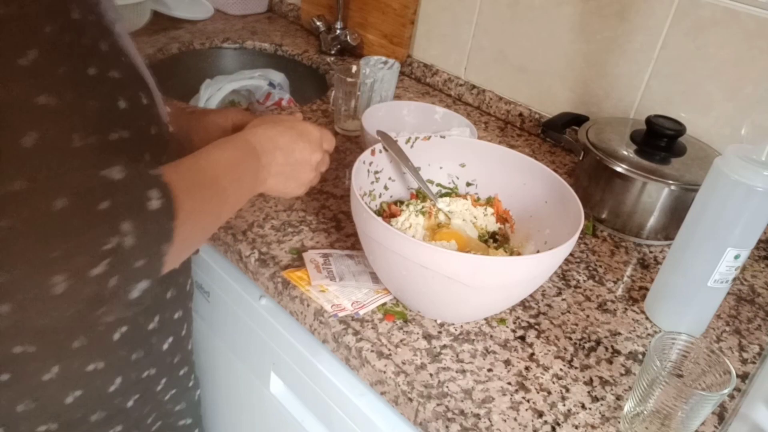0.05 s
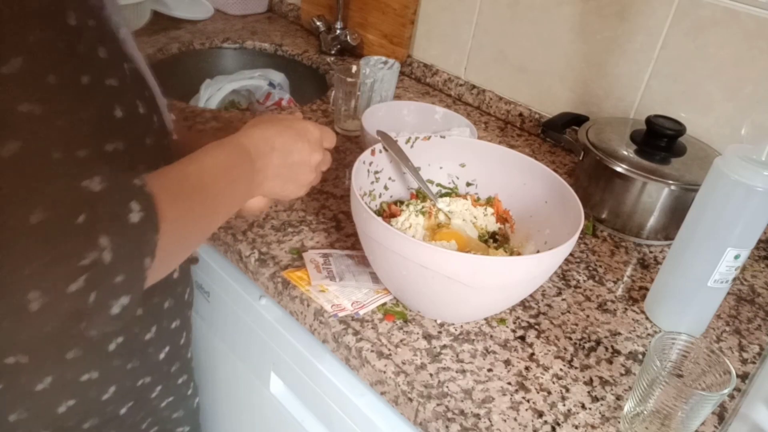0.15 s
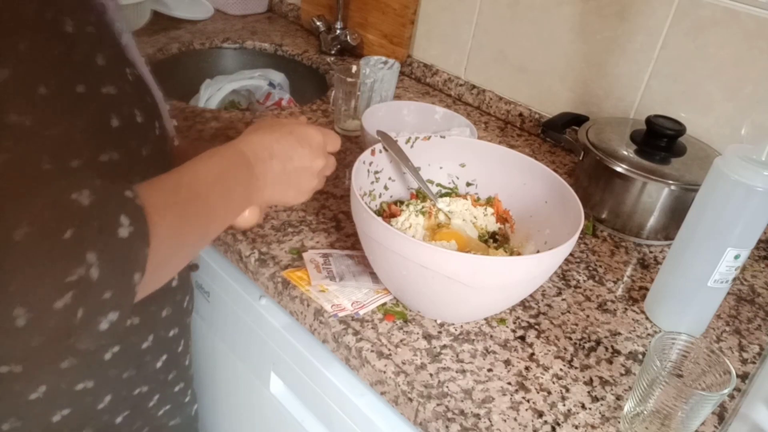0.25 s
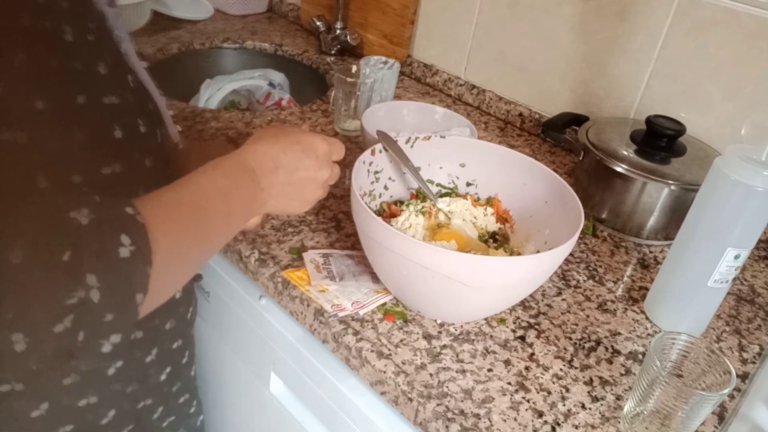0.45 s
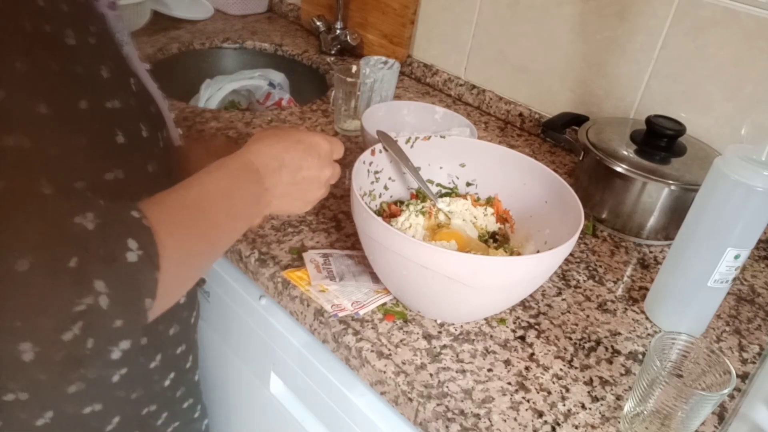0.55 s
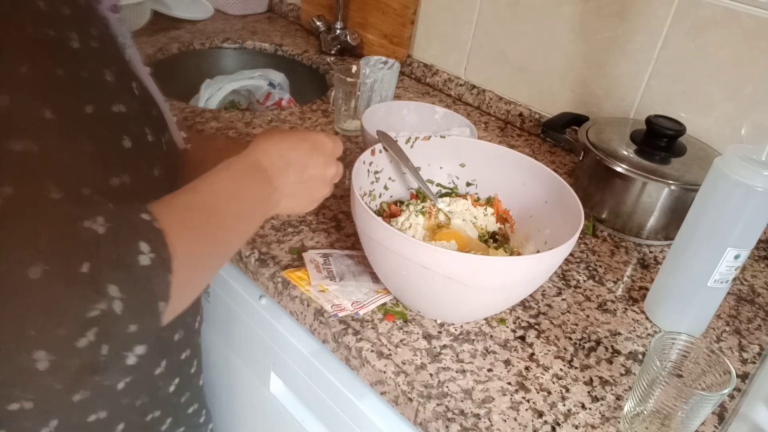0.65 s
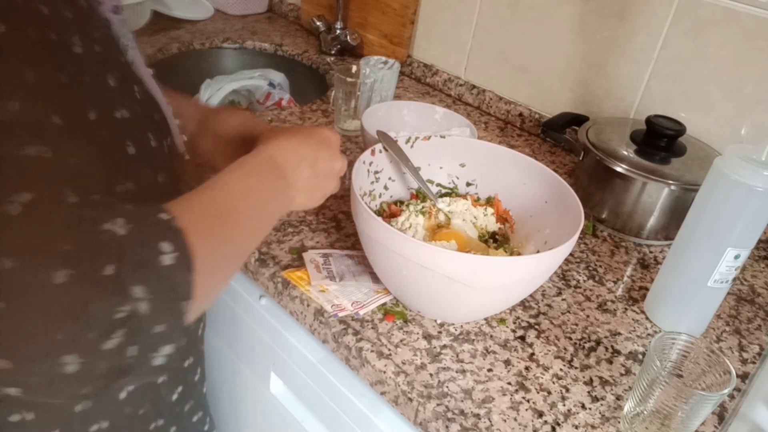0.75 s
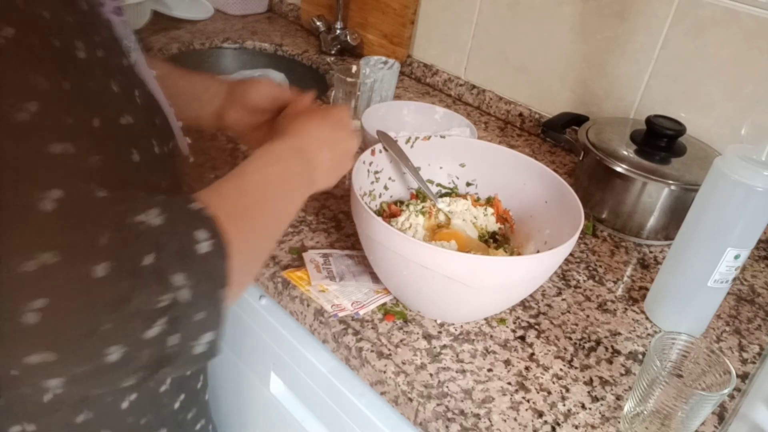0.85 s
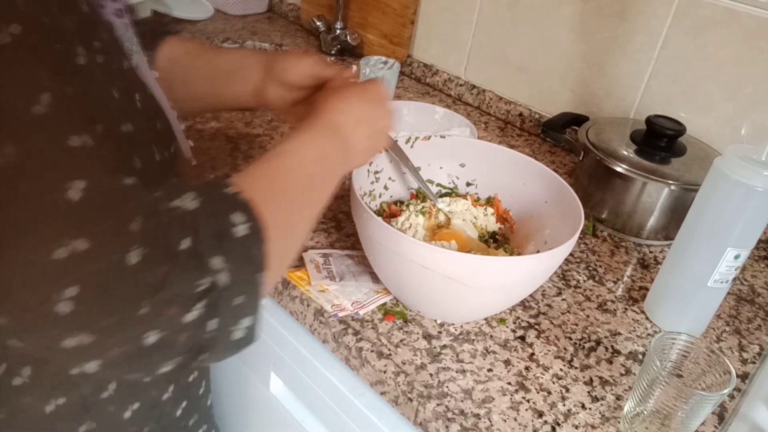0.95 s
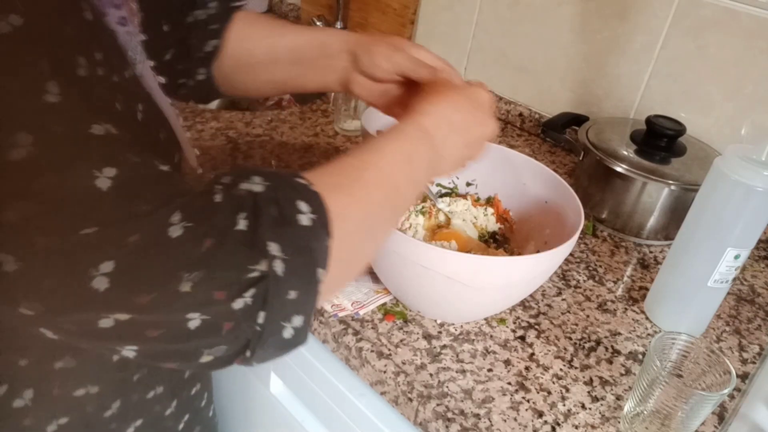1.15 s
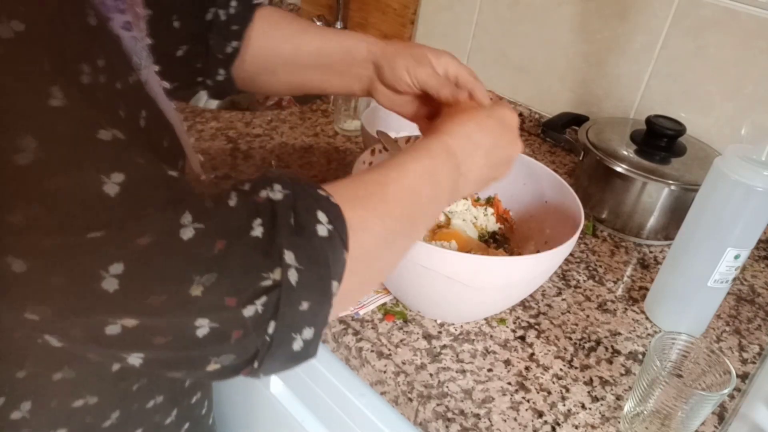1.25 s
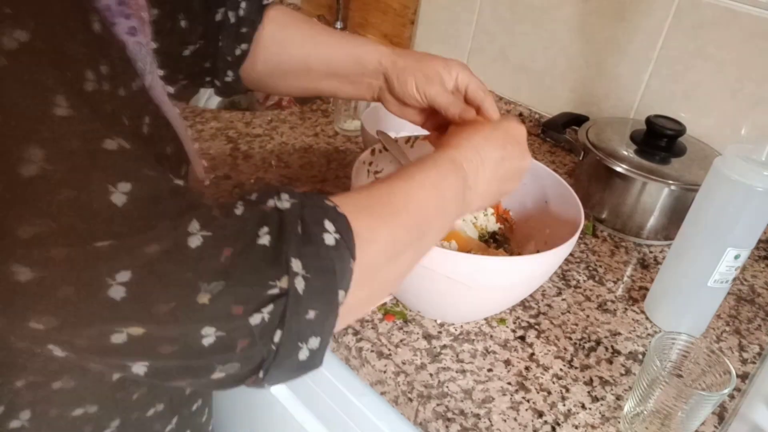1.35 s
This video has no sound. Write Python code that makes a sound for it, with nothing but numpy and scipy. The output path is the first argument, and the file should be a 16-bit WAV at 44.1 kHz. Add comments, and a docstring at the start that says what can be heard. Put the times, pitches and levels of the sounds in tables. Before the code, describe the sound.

Two quick egg cracks against a hard kitchen counter, followed by small ticks of breaking shell

```python
"""A soft rustle of cloth and skin dies away over the hush and hum of a small tiled kitchen, both shaped noise and a sine.
Fingers crackle the shell once; then an egg is knocked twice on a stone worktop, each knock a dull click,
a burst of tiny fractures and decaying sine rings, with a low thud of the hand. The shell splits further on the second.
Afterwards the shell ticks and crackles faintly, among soft low bumps of hands and dishes.
Echoes are noise bands that follow the energy held in the room."""
import sys
import numpy as np
from scipy import signal
from scipy.io import wavfile

SR = 44100
rng = np.random.default_rng(int(sys.argv[2]) if len(sys.argv) > 2 else 0)


def log_audio(samples):
    """Write samples as a 16-bit WAV file to the path given in sys.argv[1]."""
    # one column per channel
    frames = np.atleast_2d(samples).T
    # limit to full scale, then quantise
    limited = np.clip(frames, -1, 1)
    pcm = np.round(limited * 32767).astype(np.int16)
    wavfile.write(sys.argv[1], SR, pcm)


def makeup_ratio(level_db):
    """Linear amplitude ratio for a level in decibels (20 dB per factor of ten)."""
    decades = np.asarray(level_db, float) / 20
    return 10 ** decades


N = 61739  # length in samples

BAND_EDGES_HZ = 22 * 2 ** np.arange(0, 9.8, 1 / 4)  # quarter octaves


def rms_one(x):
    """Scale to unit rms."""
    return x / np.sqrt(np.mean(x ** 2) + 1e-20)


def at_hz(points, hz):
    """Read a spectrum on a log-frequency axis."""
    point_hz, value = np.transpose(points)
    return np.interp(np.log(hz), np.log(point_hz), value)


def band(x, low, high, order):
    """Butterworth band-pass."""
    edges = [max(low, 20), min(high, 20000)]
    return signal.sosfilt(signal.butter(order, edges, "band", fs=SR, output="sos"), x)


def drift(rate_hz):
    """Slow random wander of about unit rms: noise at every 40th sample through two equal smoothing poles."""
    r = np.exp(-80 * np.pi * rate_hz / SR)
    slow = signal.lfilter([1], [1, -2 * r, r * r], rng.standard_normal(N // 40 + 502))[500:]
    return np.interp(np.arange(N) / 40, np.arange(len(slow)), rms_one(slow))


def banded(gain):
    """Quarter-octave bands of noise, each under its own gain."""
    white = rng.standard_normal((2, N + 4000))
    total = np.zeros(N)
    for k, (low, high) in enumerate(zip(BAND_EDGES_HZ, BAND_EDGES_HZ[1:])):
        # neighbouring bands take turns between two noises
        noise = band(white[k % 2], low, high, order=2)[-N:]
        total += gain(np.sqrt(low * high)) * noise
    return total


# Fade of the rustle. Each row: time in seconds, level in dB.
RUSTLE_FADE = [(0, -55), (.05, -56.5), (.11, -60.5), (.15, -70.5), (.23, -90)]
# Colour of brushing cloth and skin. Each row: frequency in Hz, relative density in dB per Hz.
RUSTLE_COLOUR = [(300, -9.5), (900, -6.5), (1800, -7), (2500, -2.5), (3700, -7.5), (4700, -19), (6000, -18),
                 (7800, -6), (9500, -17), (12000, -26), (15500, -18)]


def rustle():
    """Cloth and skin brushing: coloured noise that flutters as it fades out."""
    s, db = np.transpose(RUSTLE_FADE)
    fade_db = np.interp(np.arange(N) / SR, s, db, right=-120)
    level = makeup_ratio(fade_db + .6 * drift(150))
    return level * rms_one(banded(lambda hz: makeup_ratio(at_hz(RUSTLE_COLOUR, hz))))


# Colour of the room noise. Each row: frequency in Hz, relative density in dB per Hz.
HUSH_COLOUR = [(20, -52), (50, -5), (75, -11.5), (98, -12), (135, -5.5), (200, -3.5), (400, -6), (550, -8),
               (800, -8.5), (1400, -12.5), (2000, -15.5), (2800, -19.5), (3600, -17), (4500, -28),
               (6000, -28), (7900, -20.5), (9500, -30.5), (12000, -34), (15500, -32)]
HUSH_DB = -62.5  # overall rms


def hush(patchy_db, lumps_db):
    """Steady room noise: every band wavers by itself, and those below 1200 Hz also swell together in lumps."""
    lumps = drift(28)

    def gain(hz):
        """Wavering level of one band."""
        return makeup_ratio(at_hz(HUSH_COLOUR, hz) + patchy_db * drift(8) + lumps_db * lumps * (hz < 1200))
    return makeup_ratio(HUSH_DB) * rms_one(banded(gain))


HUM_HZ, HUM_DB, HUM_WAVER_DB = 100.2, -70.5, 3  # middle pitch, middle level, rms of the level waver


def hum():
    """A faint low sine that wavers in level and pitch."""
    level = makeup_ratio(HUM_DB + HUM_WAVER_DB * drift(2.7))
    pitch_hz = HUM_HZ + 4 * drift(3.4)
    return level * np.sin(2 * np.pi * np.cumsum(pitch_hz) / SR)


SNAPS_PER_S, SNAP_SPREAD_DB, FIRST_SNAP_DB = 4000, 3.5, 5  # sizes are relative within a cluster


def snaps(s, db, hz, length, octaves, swell=0):
    """A dying cluster of tiny shell fractures: band-passed random impulses, the first one on time."""
    out, i, t = np.zeros(N), int(s * SR), np.arange(4000) / SR
    size_db = SNAP_SPREAD_DB * np.minimum(rng.exponential(1, len(t)), 3)
    sizes = makeup_ratio(size_db) * rng.choice([-1, 1], len(t))
    born = rng.random(len(t)) < SNAPS_PER_S / SR
    born[0], sizes[0] = True, makeup_ratio(FIRST_SNAP_DB)
    shape = np.exp(-t / length) * np.minimum(1, (t + 1e-4) / (swell + 1e-4))
    train = sizes * born * shape
    unit_energy = train / np.sqrt(np.sum(train ** 2))
    burst = band(unit_energy + 1e-18, hz / 2 ** octaves, hz * 2 ** octaves, order=2)
    out[i:i + len(t)] = makeup_ratio(db) * burst[:N - i]
    return out


# Shell under the fingers. Each row: start in seconds, energy in dB ahead of the band filter, centre in Hz,
# decay constant in seconds, width in octaves either side.
CRACKLES = [(.119, -25, 2600, 0.026, 0.36), (0.6262, -27.5, 7100, 0.016, 0.46),
            (0.628, -37, 13600, 0.0069, 0.26), (0.629, -31.5, 2920, 0.0056, 0.4),
            (0.768, -67, 11000, 0.0027, 0.5), (0.867, -52, 13400, 0.0036, .3),
            (1.081, -36, 4660, 0.0014, .5), (1.092, -36, 8000, 0.021, 1.5),
            (1.1796, -34, 6740, 0.0026, 0.3), (1.181, -41, 13500, .004, .3), (1.184, -30, 4200, .002, 0.11),
            (1.3015, -42, 7440, 0.0026, 0.2), (1.3663, -28, 4530, 0.0036, 0.37),
            (1.373, -31.5, 3860, .003, 0.13), (1.378, -26, 4950, 0.0017, .12),
            (1.376, -30.5, 9300, 0.011, 0.35)]


def crackles():
    """Fingers make the shell tick and crackle: each row is one cluster of fractures."""
    return sum(snaps(*row) for row in CRACKLES)


# Dying away of the tiled room. Each row: frequency in Hz, seconds to fall by 60 dB.
ROOM_T60 = [(80, 0.58), (210, 0.39), (560, 0.38), (1470, 0.32), (3880, 0.29), (10200, 0.21)]
# Colour of the echoes. Each row: frequency in Hz, gain in dB, on top of ROOM_DB.
ROOM_COLOUR = [(60, 3), (200, 11.5), (330, 10.5), (600, 7.5), (1000, 6), (1500, 10), (3500, 5),
               (5000, -5.5), (8000, -0.5), (12000, -12.5), (16000, -3)]
ROOM_DB, FIRST_ECHO_S = 5.5, .002
EARLY_DB, EARLY_T60_S = -2.5, 0.011  # the brief bloom, against the long tail


def kitchen(x):
    """Diffuse echoes: the energy of each band fills the room, blooms briefly and then dies at the band's own rate."""
    x = np.concatenate([np.zeros(int(FIRST_ECHO_S * SR)), x])[:N]
    step = 2 ** (1 / 8)
    early = makeup_ratio(-120 / (EARLY_T60_S * SR))  # energy kept per sample

    def stored(hz):
        """Level held in the room around hz, against the width of the band."""
        power = band(x + 1e-18, hz / step, hz * step, order=1) ** 2
        late = makeup_ratio(-120 / (at_hz(ROOM_T60, hz) * SR))
        tail = signal.lfilter([1 - late], [1, -late], power)
        bloom = signal.lfilter([makeup_ratio(2 * EARLY_DB) * (1 - early)], [1, -early], power)
        return makeup_ratio(ROOM_DB + at_hz(ROOM_COLOUR, hz)) * np.sqrt((tail + bloom) * SR / hz)
    return banded(stored)


# Knocks on stone. Each row: start in seconds, click drive in dB, splitting energy in dB ahead of its filter,
# splitting centre in Hz, splitting decay constant in seconds, splitting swell in seconds.
KNOCKS = [(.2373, -17.5, -6, 5100, 0.0079, 0.00022), (.4173, -22, -5.5, 9000, 0.0092, 0.0033)]
# Ringing of egg and worktop. Each row: frequency in Hz, level in dB at the first knock, at the second knock
# (both before swell and decay), seconds to fall by 60 dB, swell in seconds.
RINGS = [(101, -37, -40.5, .3, 0.066), (198.6, -42, -30.5, 0.085, 0.0097), (315.5, -52, -38, 0.23, 0.027),
         (382.5, -27.5, -31.5, 0.079, 0.0029), (529, -24, -32, 0.025, 0.0017),
         (625, -48, -50, 0.02, 0.00092), (797, -33, -42.5, 0.054, 0.0016),
         (1290, -31, -29.5, 0.084, 0.0012), (1501, -31.5, -49.5, 0.096, 0.0016),
         (2400, -43, -41, 0.15, 0.00033), (2726, -17, -21.5, 0.013, 0.0023),
         (3450, -29, -44, 0.085, 0.00054), (3650, -35, -41, 0.096, 0.0013), (7000, -65, -51, .04, 0.0012),
         (7980, -56, -21.5, 0.029, 0.00059), (8300, -25, -44, 0.032, 0.0009)]
CONTACT_HZ, SPLIT_OCTAVES = 2640, 1.2  # the click is dull above this; splitting width either side


def knocks():
    """Contact click and splitting shell as one signal; decaying sine modes of egg and worktop as another."""
    hits, rings = np.zeros(N), np.zeros(N)
    soft = np.exp(-2 * np.pi * CONTACT_HZ / SR)
    for k, (s, click_db, *split, swell_s) in enumerate(KNOCKS):
        click = np.zeros(N) + 1e-18
        click[int(s * SR)] = makeup_ratio(click_db) / (1 - soft)
        hits += signal.lfilter([(1 - soft) ** 2], [1, -2 * soft, soft * soft], click)
        hits += snaps(s, *split, SPLIT_OCTAVES, swell_s)
        t = np.maximum(np.arange(N) / SR - s, 0)
        for hz, *db, t60, swell in RINGS:
            envelope = makeup_ratio(db[k] - 60 * t / t60) * (1 - np.exp(-(t / swell) ** 2))
            rings += envelope * np.sin(2 * np.pi * hz * t)
    return hits, rings


def low_pushes(rows):
    """Short low pushes: a sine under a bell-shaped envelope."""
    t = np.arange(N) / SR
    total = np.zeros(N)
    for s, db, hz, length in rows:
        bell = np.exp(-((t - s) / length) ** 2 / 2)
        total += makeup_ratio(db) * bell * np.sin(2 * np.pi * hz * (t - s) + 1)
    return total


# Weight of the hand. Each row: centre in seconds, level in dB, frequency in Hz,
# standard deviation of the bell in seconds.
THUDS = [(0.247, -38.5, 132, 0.0067), (.43, -32, 154, 0.0018)]


def thuds():
    """The hand's weight lands just after each knock."""
    return low_pushes(THUDS)


# Hands and dishes. Each row: centre in seconds, level in dB, frequency in Hz,
# standard deviation of the bell in seconds.
BUMPS = [(.642, -51.5, 340, .002), (.8115, -56.5, 354, 0.0022), (.889, -56.5, 494, 0.0011),
         (1.044, -56, 407, 0.0017), (1.3925, -55, 375, 0.0021)]


def bumps():
    """Soft low bumps of hands and dishes."""
    return low_pushes(BUMPS)


MIC_PEAK_HZ, MIC_PEAK_DB, MIC_PEAK_WIDTH_HZ = 8000, 4, 1200  # the level is that of the added resonance


def microphone_peak(x):
    """A two-pole treble resonance of the microphone, added to what it hears."""
    r, w = np.exp(-np.pi * MIC_PEAK_WIDTH_HZ / SR), 2 * np.pi * MIC_PEAK_HZ / SR
    resonance = signal.lfilter([(1 - r * r) / 2, 0, (r * r - 1) / 2], [1, -2 * r * np.cos(w), r * r], x)
    return x + makeup_ratio(MIC_PEAK_DB) * resonance


RING_TO_ROOM_DB, LOW_CUT_HZ = -19, 70


def scene():
    """Knocks and crackles in the kitchen, over rustle, hush, hum and bumps."""
    hits, rings = knocks()
    hits = hits + crackles()
    rings = rings + thuds()
    echoes = kitchen(hits + makeup_ratio(RING_TO_ROOM_DB) * rings)
    near = microphone_peak(hits + echoes)
    # the direct rings and thuds bypass the treble peak
    near = band(near + rings, LOW_CUT_HZ, 16000, order=2)
    background = hum() + rustle() + hush(patchy_db=0.77, lumps_db=1.4)
    return (near + bumps() + background)[None]


def band_limit(x):
    """A steep low-pass at the top of the band."""
    return signal.sosfilt(signal.butter(12, 16600, fs=SR, output="sos"), x)


def record(dry):
    """A steep low-pass takes off the top of the treble."""
    cut = signal.cheby2(10, 20, 15800, fs=SR, output="sos")  # 20 dB down from 15800 Hz
    mix = signal.sosfilt(cut, dry)
    return band_limit(mix)


dry = scene()
out = record(dry)
log_audio(out)
```